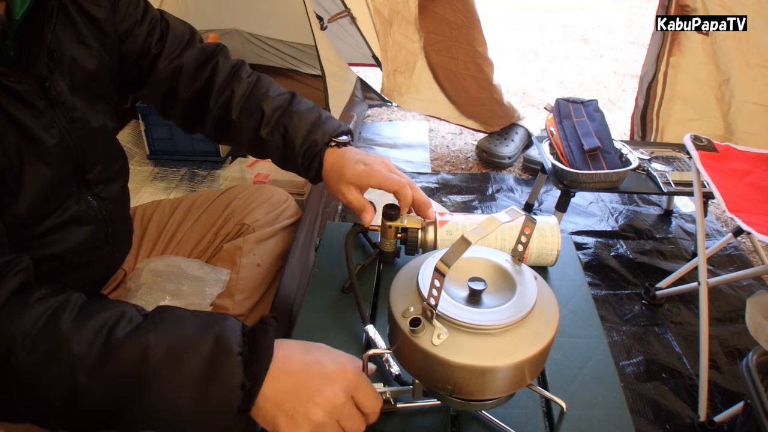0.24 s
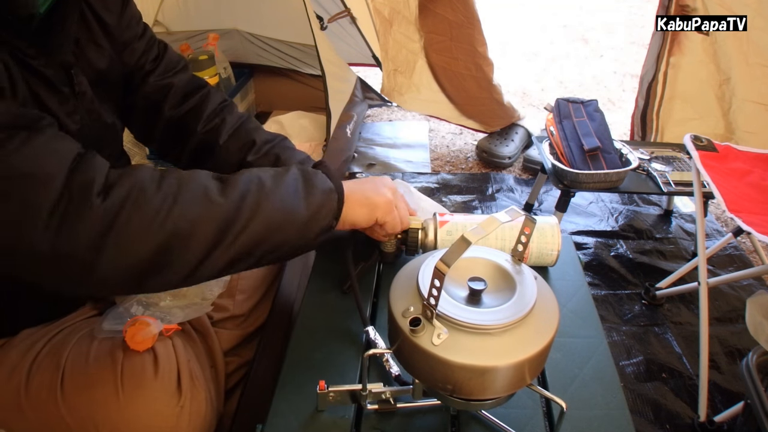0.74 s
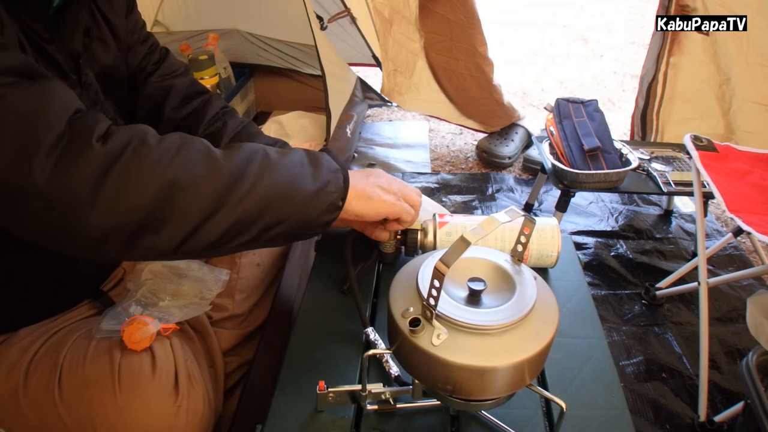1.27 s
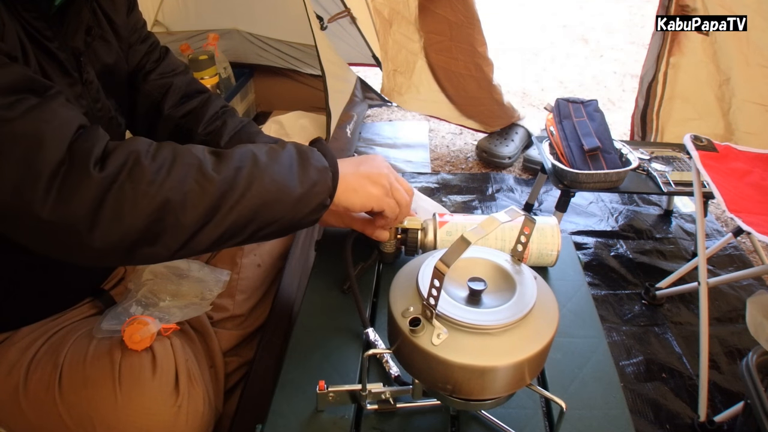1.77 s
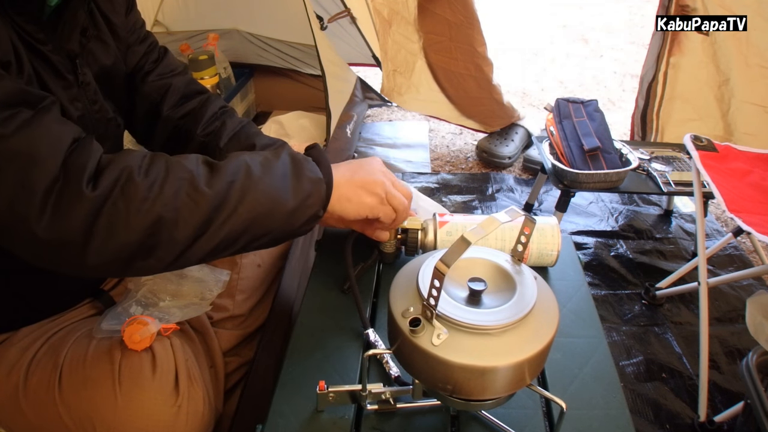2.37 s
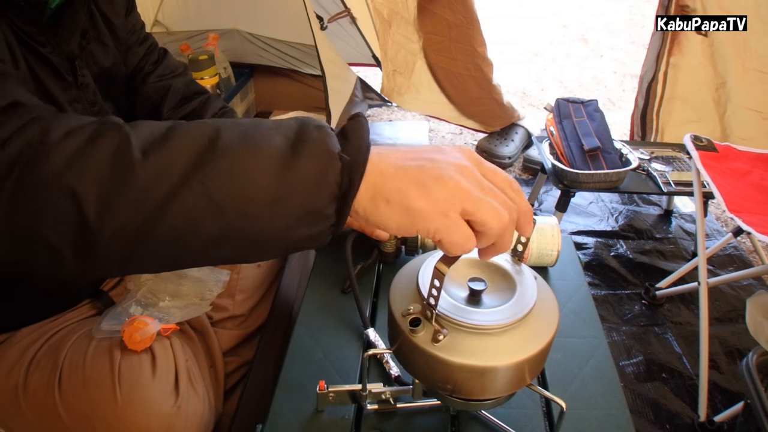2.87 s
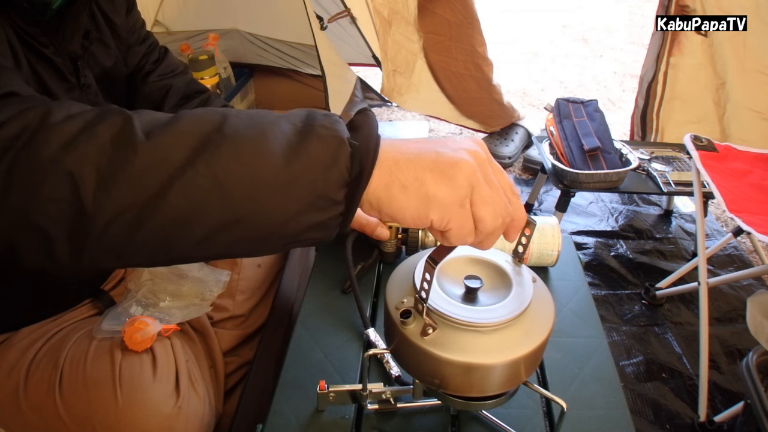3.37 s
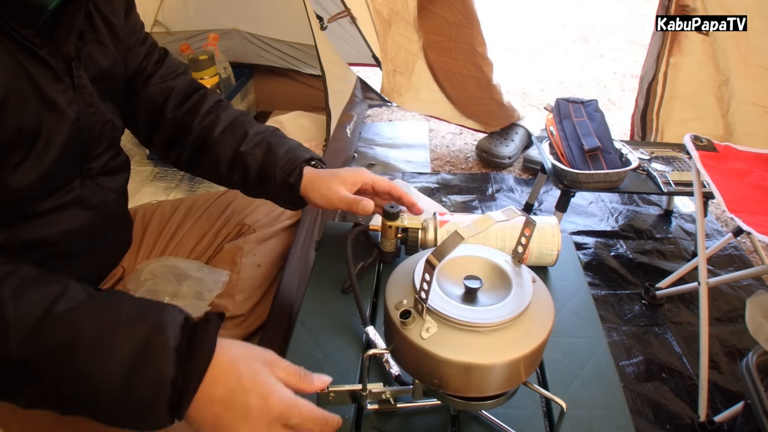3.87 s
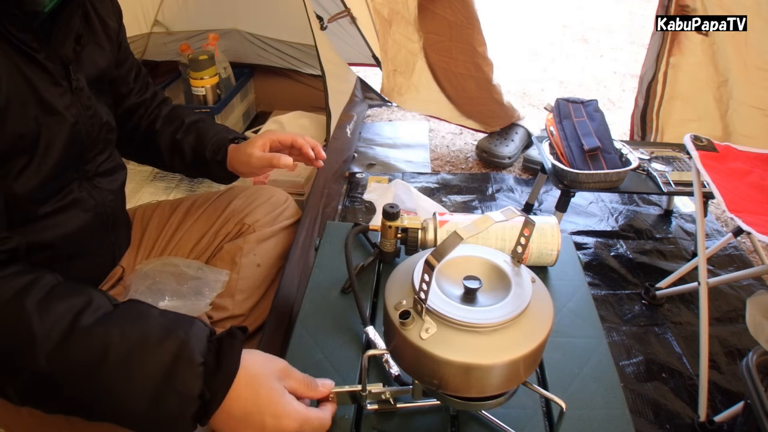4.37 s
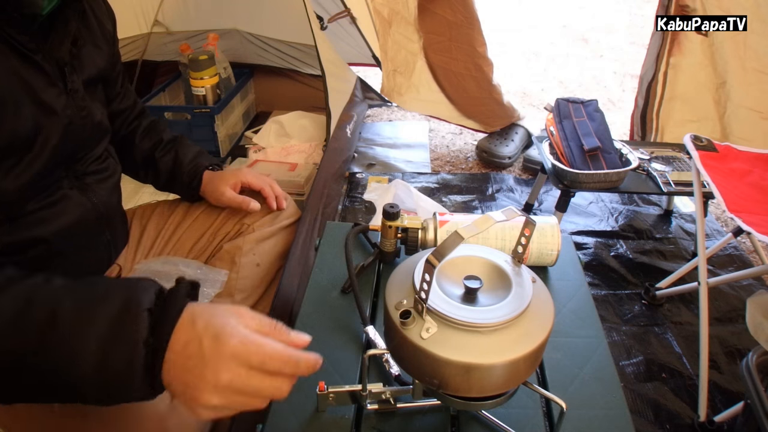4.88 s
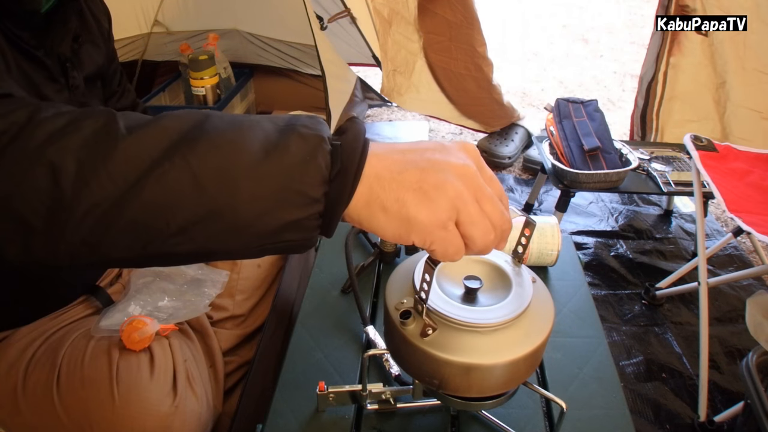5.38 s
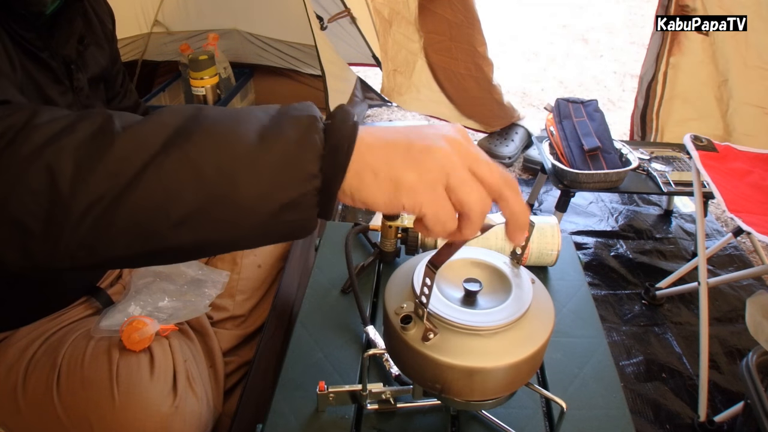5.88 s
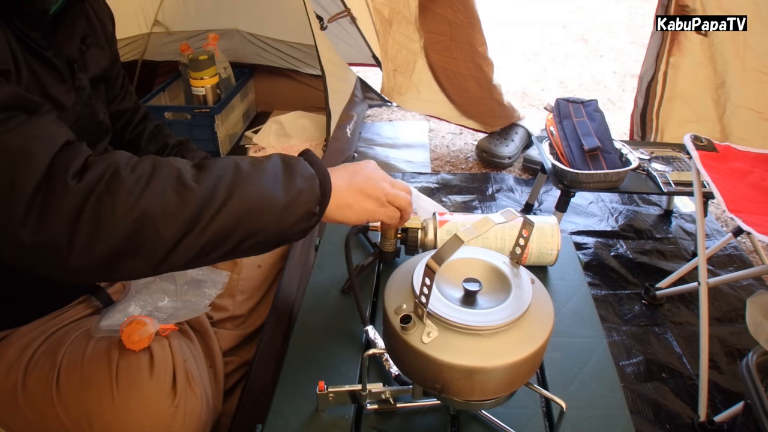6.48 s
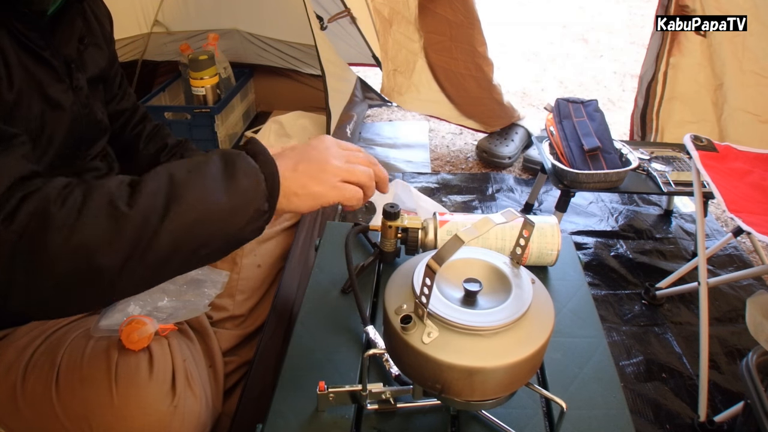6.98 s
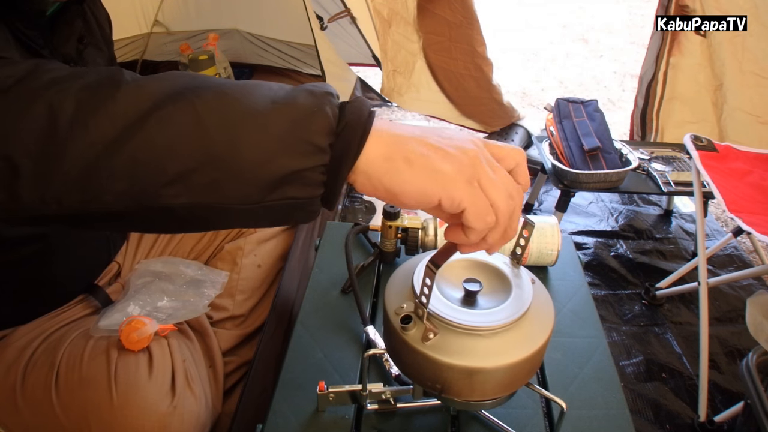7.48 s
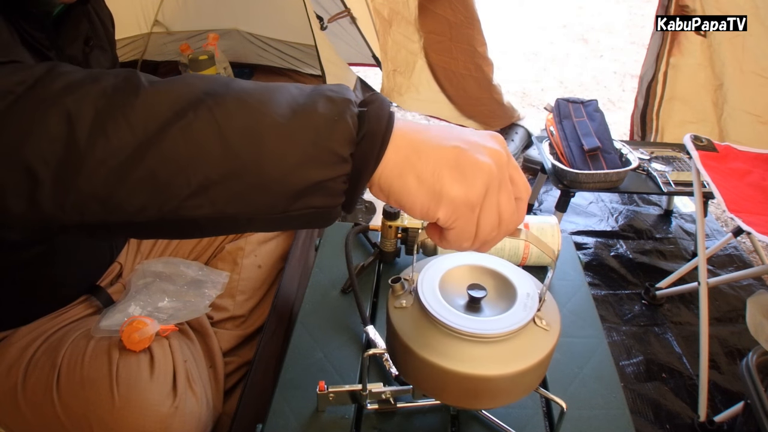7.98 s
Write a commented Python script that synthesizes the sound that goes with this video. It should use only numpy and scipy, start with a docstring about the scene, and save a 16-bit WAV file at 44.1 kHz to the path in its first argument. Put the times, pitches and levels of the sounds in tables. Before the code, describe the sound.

Close steady gas hiss in a tent, small valve ticks and a brass ping, three hard clicks, flame catching, kettle handle clinking and scraping.

```python
"""A camping gas stove hisses under a kettle in a tent: coloured noise for jet and burner head, plus thin sines.
The valve, touched in noise bursts, is opened further. The piezo igniter snaps three times, a pulse with ringing
modes and noise; the third lights a softly roaring noise flame. The kettle's handles clink (modes, clatter), rub
and scrape (noise, random slips) as it is lifted. Peaks overload the camera's gain control, the third snap most:
it ducks everything and recovers slowly."""
import sys
import numpy as np
from scipy import signal
from scipy.fft import rfft, irfft, next_fast_len
from scipy.io import wavfile
from scipy.ndimage import uniform_filter1d, minimum_filter1d, map_coordinates

SR = 44100
rng = np.random.default_rng(int(sys.argv[2]) if len(sys.argv) > 2 else 0)


def transcribe(signal):
    """Save signal, clipped to [-1, 1], as a 16-bit WAV file at the path in sys.argv[1]."""
    frames = np.atleast_2d(signal).T
    limited = np.clip(frames, -1, 1)
    pcm = np.round(limited * 32767).astype(np.int16)
    wavfile.write(sys.argv[1], SR, pcm)


N = 363384
TIME_S = np.arange(N) / SR


def amp(db):
    """Decibels to linear gain."""
    return 10 ** (np.asarray(db) / 20)


def unit(x):
    """Scale to rms 1."""
    return x / np.sqrt(np.mean(x ** 2) + 1e-20)


def along(points, hz):
    """Interpolate (frequency [Hz], value) points on a log frequency axis."""
    point_hz, values = np.transpose(points)
    return np.interp(np.log(hz + 1), np.log(point_hz + 1), values)


def curves(rows):
    """One value per sample for each column after the time."""
    time_s, *columns = np.transpose(rows)
    return [np.interp(TIME_S, time_s, column) for column in columns]


def wobble(knots_per_s):
    """Smooth random curve through normally distributed knots."""
    knots = rng.standard_normal(int(N * knots_per_s / SR) + 4)
    return map_coordinates(knots, [TIME_S * knots_per_s])


def colour(x, spectrum, peaks=(), size=16384):
    """Causal minimum-phase filter: broad spectrum with resonant peaks or dips on top."""
    hz = np.fft.rfftfreq(size, 1 / SR)
    db = along(spectrum, hz)
    for peak_hz, width_hz, lift_db in peaks:
        db = db + lift_db / (1 + (2 * (hz - peak_hz) / width_hz) ** 2)
    # folded cepstrum gives minimum phase
    cepstrum = irfft(np.log(amp(db)))[:size // 2]
    cepstrum[1:] *= 2
    response = irfft(np.exp(rfft(cepstrum, size)))[:size // 2]
    length = x.shape[-1]
    m = next_fast_len(length + size // 2)
    return irfft(rfft(x, m) * rfft(response, m), m)[..., :length]


def noise(spectrum, peaks, alike, size=N):
    """Coloured stereo noise of rms 1; alike sets left-right correlation by frequency."""
    m = next_fast_len(size)
    correlation = np.clip(along(alike, np.fft.rfftfreq(m, 1 / SR)), -1, 1)
    turn_rad = np.arccos(correlation) / 2
    white = rfft(rng.standard_normal((2, m)))
    mid, side = irfft(white * [np.cos(turn_rad), np.sin(turn_rad)], m)[:, :size]
    return unit(colour(np.array([mid + side, mid - side]), spectrum, peaks))


def pan(x, left_db):
    """Tip a stereo sound to the left by the given left-right level difference."""
    return x * amp([[left_db / 2], [-left_db / 2]])


def touches(rows, rise_s, t60_s):
    """Summed contact envelopes from (peak time [s], level [dB]): exponential rise and decay."""
    envelope = np.zeros(N)
    for peak_s, db in rows:
        t = TIME_S - peak_s
        decay = amp(db - 60 * np.maximum(t, 0) / t60_s)
        envelope += decay * np.exp(np.minimum(t, 0) / rise_s)
    return envelope


def struck(start_s, db, modes, rise_s=0.0011):
    """One blow: each mode starts at a slightly random strength and dies at its own speed."""
    out = np.zeros(N + SR)
    t = np.arange(SR // 3) / SR
    ring = 0
    for hz, mode_db, t60_s in modes:
        decay = amp(db + mode_db + rng.normal() - 60 * t / t60_s)
        ring = ring + decay * np.sin(2 * np.pi * hz * t)
    out[round(start_s * SR):][:len(t)] = ring * (1 - np.exp(-t / rise_s))
    return out[:N]


# noise spectra: (frequency [Hz], relative density [dB])
JET_SPECTRUM = [(25, -44), (60, -22), (120, -1.5), (280, -0.5), (550, -6.5), (850, -11), (1450, -13.5),
                (2600, -12.5), (4200, -13.5), (8000, -17.5), (9500, -12), (12000, -15), (15500, -20.5)]
HEAD_SPECTRUM = [(30, -21.5), (100, -6), (800, -8.5), (1400, -16), (2400, -3), (3700, -8), (5200, -2),
                 (6600, -9), (9000, -14.5), (11000, -11.5), (15500, -20.5)]
FLAME_SPECTRUM = [(25, -44), (55, -22.5), (100, 0.5), (150, 3), (350, -4.5), (700, -12), (1450, -25),
                  (2500, -15.5), (4000, -20), (5300, -13.5), (6600, -24), (8200, -19), (11000, -25),
                  (15500, -30)]
# resonances and dips: (frequency [Hz], width [Hz], lift [dB])
JET_PEAKS = [(312, 20, 5), (1086, 130, 13.5), (1930, 200, 5.5), (3165, 400, 9), (9020, 740, 8.5),
             (9800, 250, -1), (13800, 360, 4)]
HEAD_PEAKS = [(1803, 170, 13.7), (2395, 210, 8.6), (2840, 90, 4.9), (4584, 410, 10.1), (4960, 81, 14.4),
              (5900, 150, 1.1), (7480, 160, 12), (8590, 400, 16.5)]
FLAME_PEAKS = [(264, 57, -11), (382, 80, 3), (880, 310, -8), (1184, 210, 8), (1870, 160, 4),
               (2356, 290, 7.5), (2830, 110, 7.5), (3460, 230, 8), (4630, 210, 7.5), (4960, 170, 10.5),
               (5630, 130, 11.5), (7500, 250, 5.5), (8900, 330, 10)]
# left-right likeness: (frequency [Hz], correlation [-1..1])
JET_ALIKE = [(100, 0.88), (600, 0.56), (1100, 0.58), (2500, 0.3), (4000, .4), (6000, 0.3), (8900, -0.45),
             (11000, -.2), (15000, 0.33)]
HEAD_ALIKE = [(100, 0.93), (700, 0.9), (1800, 1), (2900, .94), (3500, 0.76), (4700, .7), (5800, -0.033),
              (7400, 0.91), (8300, 0.099), (11000, -.3), (15000, 0.15)]
# burner direction: (frequency [Hz], left minus right [dB])
BURNER_LEFT_DB = [(100, -.5), (1100, -1.5), (2400, 0.5), (3400, 2), (4900, 4.5), (6000, 4), (7400, 1),
                  (8500, -4), (11000, 0), (14000, .5)]
# head hiss as the valve opens: (time [s], level [dB])
OPENING = [(1.25, -62), (1.5, -48.5), (2.1, -44.5), (2.8, -43)]
JET_DB, FLAME_DB = -47, -41
LIT_HEAD_CHANGE_DB = -7
LIGHT_S, SPREAD_S = 4.41, 0.04


def stove():
    """Gas rushes from the jet and sings in the burner head; once lit, the head quietens and the flame roars."""
    lit = np.clip((TIME_S - LIGHT_S) / SPREAD_S, 0, 1)
    head_db = curves(OPENING)[0] + LIT_HEAD_CHANGE_DB * lit
    jet = amp(JET_DB + 0.38 * wobble(5)) * noise(JET_SPECTRUM, JET_PEAKS, JET_ALIKE)
    head = amp(head_db + 0.94 * wobble(12)) * noise(HEAD_SPECTRUM, HEAD_PEAKS, HEAD_ALIKE)
    flame_gain = lit * amp(FLAME_DB + 0.64 * wobble(16))
    flame = flame_gain * noise(FLAME_SPECTRUM, FLAME_PEAKS, HEAD_ALIKE)
    left, right = head + flame
    left = colour(left, [(hz, db / 2) for hz, db in BURNER_LEFT_DB])
    right = colour(right, [(hz, -db / 2) for hz, db in BURNER_LEFT_DB])
    return pan(jet, left_db=-0.5) + np.array([left, right])


# thin tones of the jet: (frequency [Hz], rms level [dB])
WHISTLE_TONES = [(8750, -63), (8871, -64.5), (8931, -58), (10003, -69)]


def whistle(drift_hz=4):
    """Nozzle tones, slightly unsteady in pitch and level, with a fixed phase offset between channels."""
    out = np.zeros((2, N))
    for hz, db in WHISTLE_TONES:
        phase_rad = 2 * np.pi * np.cumsum(hz + drift_hz * wobble(30)) / SR
        level = np.sqrt(2) * amp(db + 2.5 * wobble(12))
        out += level * np.sin([phase_rad, phase_rad + 1.2])
    return out


# fingers grip and brush the valve: (peak time [s], level [dB], brass ring re grip [dB])
GRIPS = [(.374, -38.5, 0), (0.424, -40, -6), (.783, -47, -20), (0.838, -35, -10), (.877, -45, -20),
         (1.735, -42, -15), (4.252, -36, -15)]
GRIP_RISE_S, GRIP_T60_S = 0.011, 0.098
# knob, lever and stand tick under the hand: (peak time [s], level [dB])
TICKS = [(1.266, -46), (1.346, -43.5), (1.425, -43), (2.581, -44), (4.316, -31.5), (4.496, -27.5),
         (4.595, -37), (4.764, -39), (6.631, -23.5), (6.92, -37), (7.65, -37.5), (7.76, -40.5)]
TICK_RISE_S, TICK_T60_S, TICK_BRASS_DB = 0.00053, 0.058, -16
# brass fitting is knocked: (time [s], level [dB])
PING = (.6131, -25)
PING_BUZZ_DB, PING_BUZZ_T60_S = -9, 0.14  # buzz on the thread, re ping
# fitting modes: (frequency [Hz], relative level [dB], t60 [s])
FITTING_MODES = [(2300, -15, 0.073), (2900, -9, 0.056), (3130, 0.5, 0.056), (3482, 2.5, 0.016),
                 (5300, -23, 0.079)]
# noise spectra: (frequency [Hz], relative density [dB])
KNOB_SPECTRUM = [(100, -15), (250, -8), (450, 2), (850, 0), (1200, 0.5), (1850, 0), (2800, -1.5),
                 (4200, -6), (6000, -9), (9000, -13.5), (15000, -23.5)]
BRASS_SPECTRUM = [(1500, -27), (2750, -33), (3150, -2), (3600, -23), (4200, -25.5), (5200, -24.5),
                  (7000, -28), (14000, -39)]


def valve():
    """Fingers grip and turn the knob in tiny jerks, small parts tick, and the brass fitting pings."""
    alike = [(500, 0.96), (3000, 0.93), (8000, 0.5)]
    ticks = touches(TICKS, TICK_RISE_S, TICK_T60_S)
    grips = touches([(s, db) for s, db, _ in GRIPS], GRIP_RISE_S, GRIP_T60_S)
    grip_brass = touches([(s, db + brass_db) for s, db, brass_db in GRIPS], GRIP_RISE_S, GRIP_T60_S)
    buzz = amp(PING_BUZZ_DB) * touches([PING], TICK_RISE_S, PING_BUZZ_T60_S)
    jerks = unit(amp(2.2 * wobble(450)))
    brush = (ticks + grips) * jerks * noise(KNOB_SPECTRUM, (), alike)
    ring = (amp(TICK_BRASS_DB) * ticks + grip_brass + buzz) * noise(BRASS_SPECTRUM, (), alike)
    return pan(brush + ring + struck(*PING, FITTING_MODES), left_db=0.7)


# handles knock on their stops:
# (time [s], handle ring [dB], clatter [dB], hollow body [dB], rise [s])
CLINKS = [(3.0047, -25, -29, -37.5, 0.0036), (5.6893, -13.5, -20, -26, 0.0012),
          (8.1981, -39, -22.5, -20.5, 0.0015)]
# handle and kettle body modes: (frequency [Hz], relative level [dB], t60 [s])
HANDLE_MODES = [(885, -6, 0.029), (1163, -7.5, 0.042), (1530, -20, 0.096), (1777, 3.5, 0.073),
                (1870, -4, 0.076), (2240, -9, 0.13), (2700, -35, 0.044), (3600, -12, 0.12),
                (4250, -18.5, 0.15), (5880, -20, 0.14)]
BODY_MODES = [(525, 2.5, 0.062), (628, -6, 0.13), (840, -6.5, 0.038)]
# clatter spectrum: (frequency [Hz], relative density [dB])
CLATTER_SPECTRUM = [(100, -33), (500, -2.5), (900, -19), (1400, -11), (2200, -4.5), (2750, -2.5),
                    (3500, -2), (4200, -28), (6200, -15), (10000, -27.5), (15000, -39)]


def handles(clatter_t60_s=0.099, body_delay_s=0.00182):
    """A handle falls on its stop: it rings, clatters briefly and knocks the hollow body."""
    rings, clatter = np.zeros(N), np.zeros(N)
    for time_s, ring_db, clatter_db, body_db, rise_s in CLINKS:
        rings += struck(time_s, ring_db, HANDLE_MODES, rise_s)
        rings += struck(time_s + body_delay_s, body_db, BODY_MODES)
        clatter += touches([(time_s + rise_s, clatter_db)], rise_s, clatter_t60_s)
    alike = [(500, 1.0), (3000, 0.94), (8000, 0.41)]
    return pan(rings + clatter * noise(CLATTER_SPECTRUM, (), alike), left_db=1.0)


# handles turn in their hinges: (peak time [s], level [dB], body hum re rub [dB])
RUBS = [(3.317, -34, -10.5), (3.392, -35.5, -8), (3.448, -46.5, -2), (3.488, -36, -10.5),
        (3.519, -37.5, -14), (5.726, -33, -13), (5.756, -30, -15)]
RUB_RISE_S, RUB_T60_S = 0.011, 0.12
# scrape strokes as the kettle is lifted: (peak time [s], level [dB])
SCRAPES = [(7.875, -38.5), (7.917, -29.5), (7.955, -26.5), (7.986, -24), (8.068, -32), (8.086, -24),
           (8.148, -35)]
SCRAPE_RISE_S, SCRAPE_T60_S = 0.023, 0.16
# friction spectra: (frequency [Hz], relative density [dB])
RUB_SPECTRUM = [(100, -26), (500, -3.5), (900, -7), (1400, -8), (2300, 7.5), (2800, -3), (3600, -6.5),
                (4200, -12), (6000, -13), (15000, -33)]
SCRAPE_SPECTRUM = [(100, -50.5), (600, -1), (1000, -2), (1450, -9), (2500, 6), (3400, 0), (3950, -12.5),
                   (5500, -5), (6600, -12.5), (8800, -12), (11000, -13.5), (15000, -40)]
# resonances: (frequency [Hz], width [Hz], lift [dB])
RUB_PEAKS = [(1750, 62, 12), (2685, 150, 15), (3120, 66, 21), (3570, 110, 17)]
SCRAPE_PEAKS = [(620, 64, 2.5), (1230, 100, 14), (1807, 27, 11), (1825, 16, 5), (1860, 210, 10.5),
                (2385, 21, 11), (2440, 39, 2), (3000, 29, 2), (3290, 24, 11), (3433, 24, 10),
                (3540, 27, 10), (4234, 30, 17.5), (5390, 41, 13), (6000, 60, 7), (8600, 430, 7)]


def hinges(slips_per_s=1100):
    """Hinges rub as the handles turn, and scrape in many tiny slips under the kettle's weight."""
    alike = [(500, 1.0), (3000, 0.93), (6000, 0.33), (11000, 0.1)]
    slips = (rng.random(N) < slips_per_s / SR) * rng.uniform(-0.94, 1, N)

    def friction(spectrum, peaks):
        """Equal parts smooth noise and slips, through the same resonances."""
        return unit(noise(spectrum, peaks, alike) + unit(colour(slips, spectrum, peaks)))

    rub = touches([(s, db) for s, db, _ in RUBS], RUB_RISE_S, RUB_T60_S)
    hum = touches([(s, db + hum_db) for s, db, hum_db in RUBS], RUB_RISE_S, RUB_T60_S)
    hum_spectrum = [(100, -20), (600, 26), (1500, -41), (6000, -64)]
    body_hum = hum * noise(hum_spectrum, [(664.4, 36, 15.5)], alike)
    turning = rub * friction(RUB_SPECTRUM, RUB_PEAKS) + body_hum
    strokes = touches(SCRAPES, SCRAPE_RISE_S, SCRAPE_T60_S) * amp(1.24 * wobble(130))
    return pan(turning + strokes * friction(SCRAPE_SPECTRUM, SCRAPE_PEAKS), left_db=0.6)


# three igniter snaps, then the lever springs back: (time [s], pulse [dB]; re pulse: treble [dB],
# frame ring [dB], rattle [dB], bright spring [dB], table thump [dB])
SNAPS = [(4.0793, -10, -6, -8, -7, -40, -21), (4.2528, 5, -1.5, -2.5, -11.5, -38.5, -37.5),
         (4.4097, 29, 2.5, -14.5, -19.5, -22, -60), (4.648, -20, -10.5, -3.5, -6.5, -3, -19)]
# spectra: (frequency [Hz], relative level [dB])
PUSH_SPECTRUM = [(30, -35.5), (500, -19.5), (800, -10.5), (1150, 5), (2000, 8), (3000, -5.5), (4200, -15.5),
                 (6000, -11.5), (8000, -21.5), (13000, -12.5), (15500, -20.5)]
RATTLE_SPECTRUM = [(40, -15), (150, -13.5), (450, -17), (750, -1), (1200, -9.5), (3400, 6), (4100, -11),
                   (5800, -8), (7500, -20.5), (15000, -33.5)]
SPRING_SPECTRUM = [(1000, -25), (3000, -5), (6000, -1.5), (8500, -3), (10500, -10.5), (15000, -19)]
# stove frame and table modes: (frequency [Hz], relative level [dB], t60 [s])
FRAME_MODES = [(622, -27.5, 0.1), (1137, -11.5, 0.046), (1082, -3.5, 0.034), (1650, -11.5, 0.033),
               (2180, -15.5, 0.027), (2678, -20, .025), (3215, -11, 0.052), (3520, -14.5, .04),
               (4820, -34, 0.057), (6070, -22, .03)]
TABLE_MODES = [(245, -2.5, 0.1), (124.5, -16, 0.077)]


def igniter(rattle_t60_s=0.045, spring_t60_s=0.062, tent_db=-49, tent_t60_s=0.25):
    """The piezo hammer gives one hard pulse; frame rings, loose parts rattle, table and tent answer faintly."""
    out, size = np.zeros((2, N)), SR // 3
    t = np.arange(size) / SR
    alike = [(1000, 0.71), (3500, 0.77), (9000, 0.3)]
    crack_spectrum = [(4000, -17.5), (11000, 3)]
    tent_spectrum = [(60, -6.0), (200, 0.5), (650, -1), (3000, -13), (9000, -32.5)]

    def fade(t60_s):
        """Exponential decay by 60 dB in t60."""
        return 1000 ** (-t / t60_s)

    def ringing(modes):
        """Sum of decaying sines."""
        return sum(amp(db) * fade(t60_s) * np.sin(2 * np.pi * hz * t) for hz, db, t60_s in modes)

    def burst(db, t60_s, spectrum):
        """Decaying stereo noise."""
        return amp(db) * fade(t60_s) * noise(spectrum, (), alike, size=size)

    for time_s, pulse_db, treble_db, ring_db, rattle_db, spring_db, thump_db in SNAPS:
        push = colour(signal.unit_impulse(size), PUSH_SPECTRUM)
        push = colour(push, [(3000, 0.0055), (10000, treble_db)])
        crack = burst(treble_db - 16.0, 0.0078, crack_spectrum)
        rattle = burst(rattle_db, rattle_t60_s, RATTLE_SPECTRUM)
        spring = burst(spring_db, spring_t60_s, SPRING_SPECTRUM)
        tent = burst(tent_db, tent_t60_s, tent_spectrum)
        scatter = (crack + rattle + spring + tent) * (1 - np.exp(-t / 0.0011))
        rings = amp(ring_db) * ringing(FRAME_MODES) + amp(thump_db) * ringing(TABLE_MODES)
        snap = push / np.abs(push).max() + rings + scatter
        out[:, round(time_s * SR):][:, :size] += amp(pulse_db) * snap
    return out


def scene():
    """Sum of all sources."""
    return stove() + whistle() + valve() + handles() + hinges() + igniter()


def band_limit(x, top_hz=15850, edge_hz=500):
    """Nothing passes above the top of the camera's range; the edge is a linear slope."""
    m = next_fast_len(N + SR // 4)
    passed = np.clip((top_hz - np.fft.rfftfreq(m, 1 / SR)) / edge_hz + 0.5, 0, 1)
    return irfft(rfft(x, m) * passed, m)[:, :N]


def gain_control(x, ceiling_db=-1.2, recovery_db_per_s=11.0):
    """A peak over the ceiling pulls the gain down at once; it climbs back at a steady rate."""
    peak_db = 20 * np.log10(np.abs(x).max(axis=0) + 1e-9)
    excess_db = np.maximum(peak_db - ceiling_db, 0)
    ahead_db = -minimum_filter1d(-excess_db, size=45)  # about 0.5 ms either side
    climb_db = recovery_db_per_s * TIME_S
    duck_db = np.maximum.accumulate(ahead_db + climb_db) - climb_db
    return x * amp(-uniform_filter1d(duck_db, size=21))


# narrow dips in the camera's response: (frequency [Hz], width [Hz], lift [dB])
NOTCHES = [(2040, 60, -16), (3055, 70, -20), (4105, 55, -14), (5115, 40, -13), (6150, 55, -20)]


def record(dry):
    """The camera: narrow dips and a limited band, then gain control."""
    picked_up = band_limit(colour(dry, [(20, 0), (20000, 0)], NOTCHES))
    return band_limit(gain_control(picked_up))


dry = scene()
out = record(dry)
transcribe(out)
```